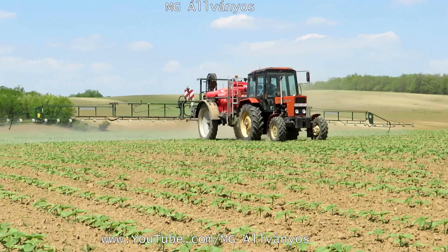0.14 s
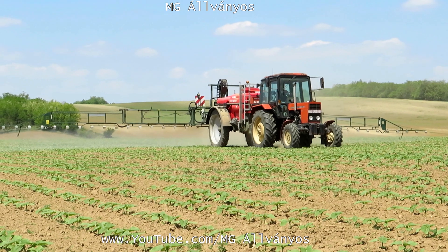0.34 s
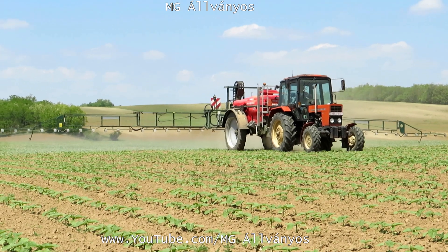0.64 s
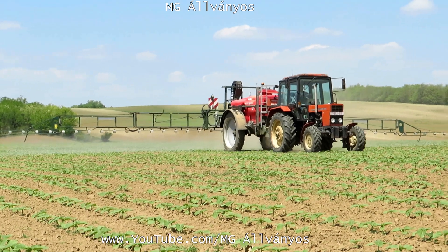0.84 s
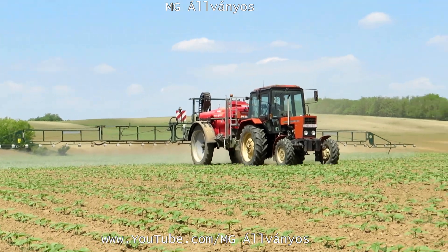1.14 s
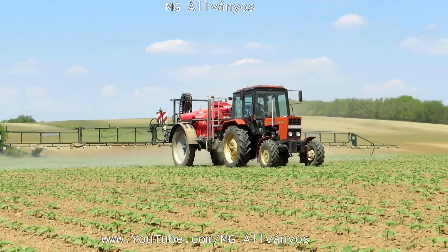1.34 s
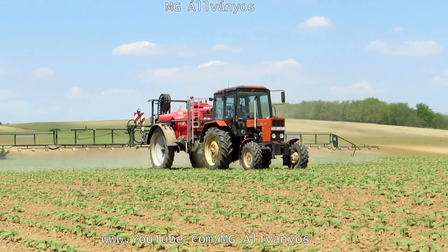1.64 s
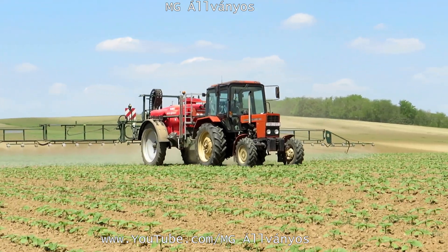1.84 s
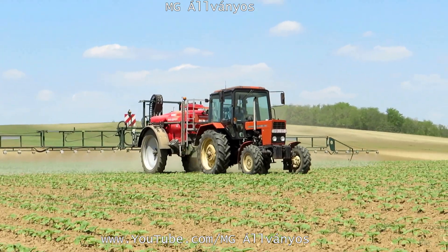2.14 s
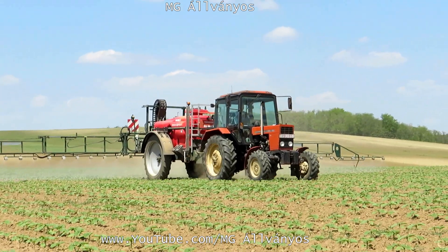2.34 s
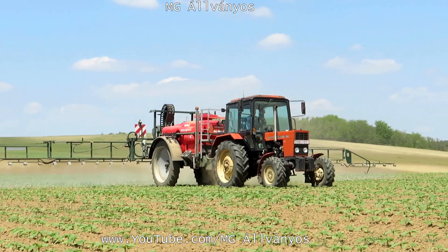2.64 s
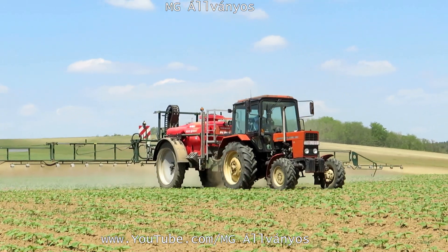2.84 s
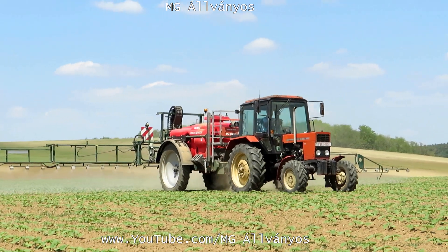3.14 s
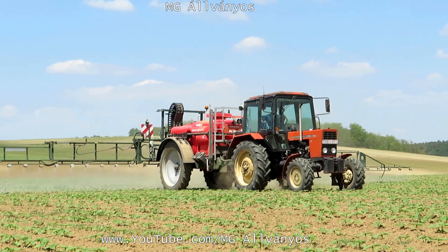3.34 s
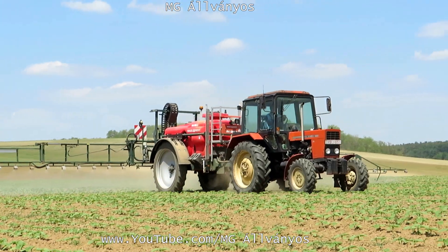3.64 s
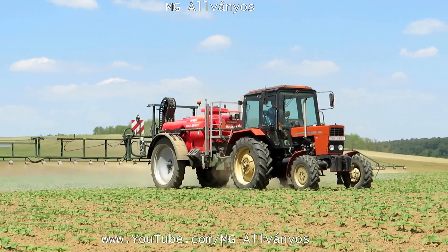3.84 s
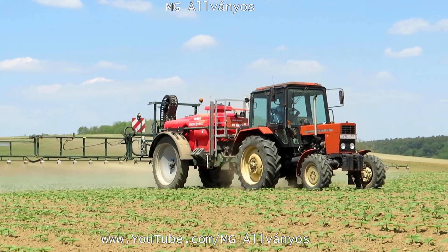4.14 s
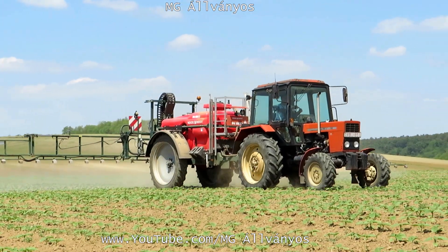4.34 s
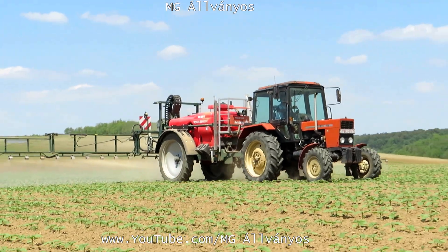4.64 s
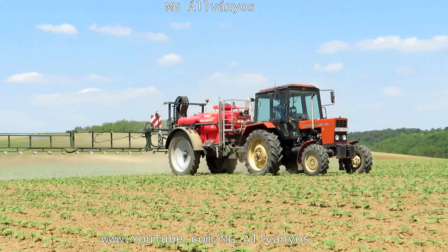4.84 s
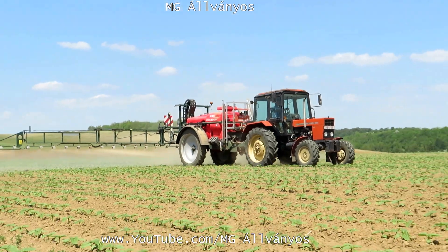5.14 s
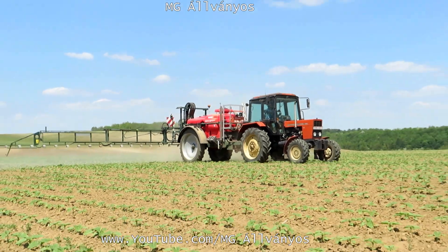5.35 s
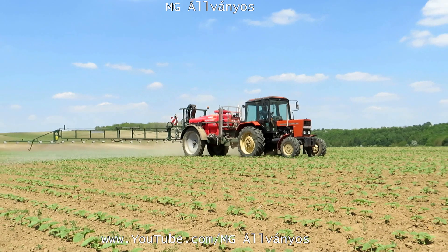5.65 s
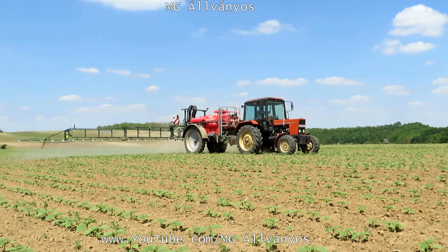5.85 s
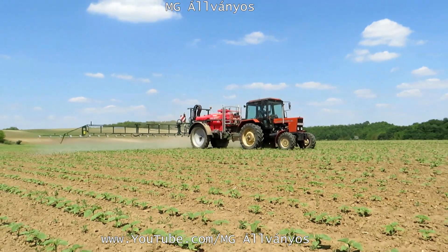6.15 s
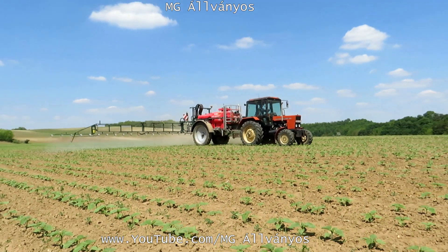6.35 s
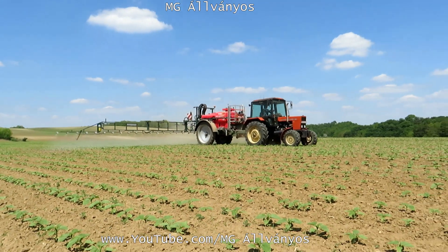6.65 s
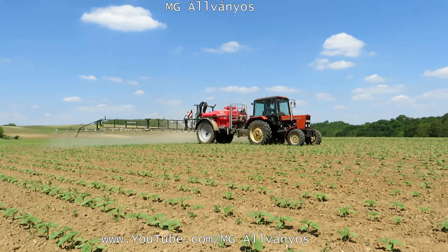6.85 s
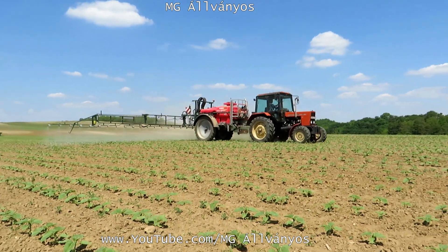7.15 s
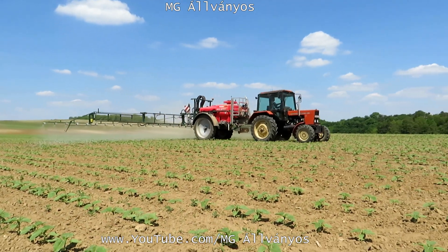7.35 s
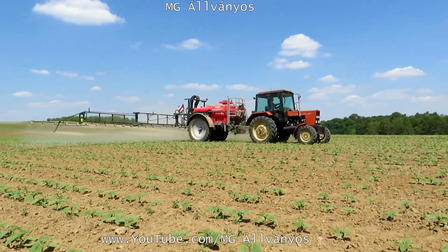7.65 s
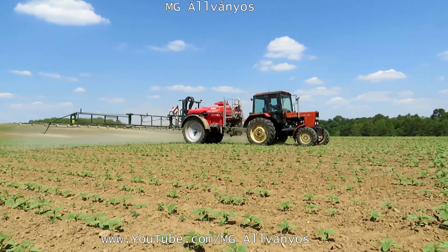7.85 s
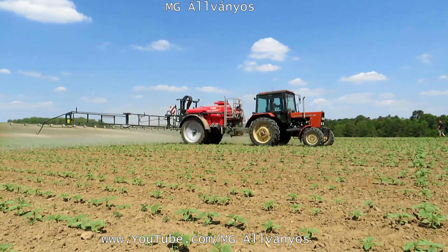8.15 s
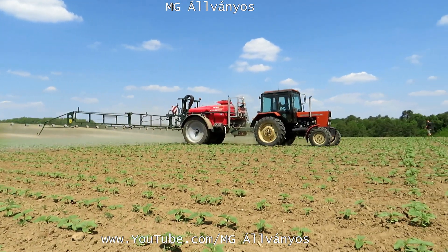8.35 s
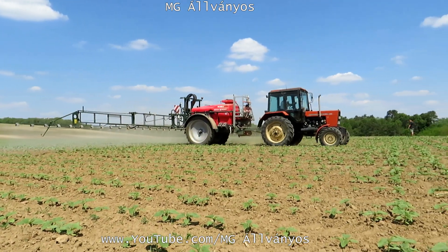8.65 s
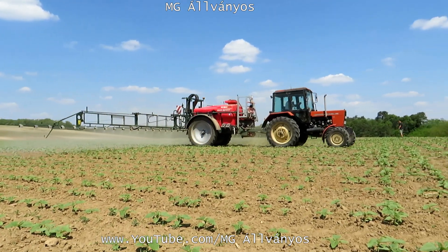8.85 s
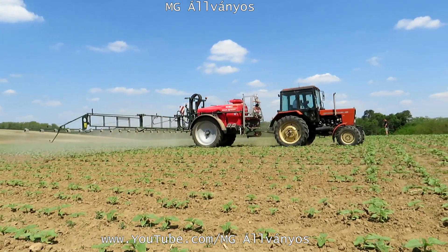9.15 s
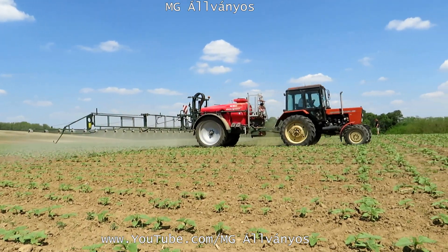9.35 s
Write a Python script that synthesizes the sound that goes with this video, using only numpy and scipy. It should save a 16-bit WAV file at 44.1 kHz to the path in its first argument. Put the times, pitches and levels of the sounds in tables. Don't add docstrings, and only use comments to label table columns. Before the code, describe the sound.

After a thump of wind and a brief gap, a four-cylinder diesel tractor chugs steadily across an open field, knocking and clattering, then eases its throttle.

```python
import sys
import numpy as np
from scipy import signal
from scipy.fft import rfft, irfft, next_fast_len
from scipy.io import wavfile
from scipy.ndimage import uniform_filter1d

SR = 44100
rng = np.random.default_rng(int(sys.argv[2]) if len(sys.argv) > 2 else 0)


def to_wav(s):
    ch = np.atleast_2d(s).T
    pcm = np.round(np.clip(ch, -1, 1) * 32767)
    wavfile.write(sys.argv[1], SR, pcm.astype(np.int16))


def ratio_of_db(decibels):
    return 10 ** (np.asarray(decibels, float) / 20)


N = 419391
TIME = np.arange(N) / SR
COARSE = np.arange(0, N + 64, 64) / SR

# time_s, share (0-1)
EASED = [
    (0, 0),
    (8.4, 0),
    (8.5, 1),
    (9.6, 1),
]
# time_s, level_db, treble_change_in_air_db, first_dark_band (octaves over 1
# kHz), band_depth (0-1)
PATH = [(.2, -10.5, -13.5, 2.5, 0), (.55, -10.5, -3, 2.7, 0), (.94, -9, 1, 1.9, 0), (1.15, -4.5, 0, 3.4, 0),
        (1.55, -2.5, 2, 8.4, 0), (2.05, 0.5, 1, 2.9, 0.5), (2.4, 1, -1.5, 2.86, 0.3),
        (2.9, -1, -1, 2.4, 1.1), (3.6, 0.5, 2, 2.3, 0.87), (4.15, -0.5, 0.5, 2.09, 1.1),
        (4.6, -0.5, -1.5, 1.77, 1), (5.05, 1.5, -0.5, 1.62, 0.86), (5.9, 1.5, -0.5, 1.55, 0.47),
        (6.25, 1.5, 1.5, 1.35, 0.4), (6.7, -0.5, -0.5, 0.94, 0.1), (7.3, 1, -2.5, 1.6, 0.14),
        (8.2, -1.5, -0.5, 1.97, 0.2), (9.5, 0, 1.5, 1.68, 0.3)]
# pitch_hz, level_db
TREBLE = [(3600, 7.5), (4600, 9.5), (6000, 3.5), (8000, -11), (10000, -58.5), (12000, -39), (15000, -55),
          (17000, -91)]
# start_s, jump (full scale 1), treble_change_db
JUMPS = [(.0002, 0.41, 0.1), (2.1606, .14, -6), (2.178, 0.22, -1.5), (3.1283, 0.048, -7.5),
         (4.096, -0.34, 2), (6.997, -0.25, -1), (8.9314, 0.52, -5.5)]


def evened(x):
    return x / np.sqrt(np.mean(x ** 2) + 1e-20)


def curve(rows, column=1, t=TIME):
    return np.interp(t, [row[0] for row in rows], [row[column] for row in rows])


def bump(t, middle_s, half_s):
    return np.exp(-((t - middle_s) / half_s) ** 2)


def filtered(x, response):
    size = next_fast_len(N + 8192)
    return irfft(rfft(x, size) * response(np.fft.rfftfreq(size, 1 / SR)), size)[..., :N]


def coloured(x, points):
    point_hz, point_db = np.transpose(points)
    return filtered(x, lambda hz: ratio_of_db(np.interp(np.log(hz + 1), np.log(point_hz + 1), point_db)))


def wind():
    # time_s, level_db
    strength = [(0, -19.5), (.015, -4.5), (.03, -17.5), (.06, -12), (.098, -12.5), (.112, -31),
                (.16, -38.5), (9.6, -45)]
    # middle_s, level_db, half_length_s
    gusts = [(3.2, -37, 0.063), (4.497, -31.5, 0.2), (4.85, -27.5, 0.11), (5.244, -26, 0.11),
             (5.57, -29, 0.054), (6.05, -31.5, 0.083), (7.205, -35, 1), (8.604, -20.5, .13),
             (8.952, -27.5, 0.21)]
    # pitch_hz, level_db
    colour = [(18, -24), (35, -18), (90, 0), (180, -1), (400, -12.5), (620, -22.5), (1200, -35),
              (4500, -53.5), (12000, -65.5), (16000, -100)]
    # middle_s, size (full scale 1), half_length_s
    buffets = [
        (.0145, 0.85, 0.0022),
        (.0925, 0.48, 0.0041),
    ]
    lumps = ratio_of_db(2.5 * evened(uniform_filter1d(rng.standard_normal(N), 700, mode="wrap")))
    noise = evened(coloured(rng.standard_normal(N) * lumps, colour))
    level = ratio_of_db(curve(strength, t=COARSE)) + sum(ratio_of_db(db) * bump(COARSE, s, half) for s, db, half in gusts)
    pushes = sum(2 * size * (TIME - s) / half * bump(TIME, s, half) for s, size, half in buffets)
    return pushes + np.interp(TIME, COARSE, level) * noise


def cycles(t=COARSE):
    # time_s, gain_cycles
    lead = [(0.2, .05), (.62, .067), (.9, .107), (2.0, .103), (2.3, .137), (3.0, .099), (3.9, .089),
            (4.8, .063), (5.5, .002), (5.9, -.001), (7.0, .005), (7.3, .033), (8.37, .037), (8.5, .097)]
    hunt = 0.01 * np.cos(2 * np.pi * 2.37 * (t - 0.096)) * (1 - curve(EASED, t=t))
    slowing_s = np.maximum(t - 8.52, 0)
    lost = 1.0 * slowing_s + 1.0 * slowing_s ** 2 / 2
    return 15.37 * t + curve(lead, t=t) + hunt - lost


def beats(place, spread_db):
    click_s = np.interp(np.arange(200) - 2 + place, cycles(), COARSE)
    at = np.ceil(SR * click_s).astype(int)
    inside = (at > 0) & (at < N)
    clicks = np.zeros(N)
    clicks[at[inside]] = ratio_of_db(spread_db * rng.standard_normal(200))[inside]
    return clicks


def bursts(clicks, rise_s, decay_s):
    slow, fast = np.exp(-1 / (SR * decay_s)), np.exp(-1 / (SR * rise_s))
    return signal.lfilter([0, 1 - fast], np.convolve([1, -slow], [1, -slow * fast]), clicks)


def mode(hz, centre_hz, width_hz):
    return 1 / (1 - (hz / centre_hz) ** 2 + 1j * hz * width_hz / centre_hz ** 2)


def heard(db, air_share, side_db, eased_db, rocking=0.51):
    turn_s = [4.73, 8.16]
    # middle_s, level_db
    lurches = [(1.57, 3.5), (2.0, 2), (2.16, -6), (2.4, 0.5), (2.82, 5), (3.3, -1), (3.6, 0.5), (4.0, 3.5),
               (4.32, 0), (4.52, 6.5), (4.95, 5), (5.33, 3.5), (5.57, 0.5), (5.85, 0.5), (6.27, 2),
               (6.57, 4.5), (6.95, 3.5), (7.4, 1.5), (7.741, 4), (8.06, 5), (8.29, 3.5), (8.6, 3.5),
               (8.78, 2.5), (8.91, 2), (9.38, 5)]
    total = db + curve(PATH, t=COARSE) + air_share * curve(PATH, column=2, t=COARSE)
    total = total + eased_db * np.sqrt(curve(EASED, t=COARSE))
    total = total + side_db * np.interp(COARSE, turn_s, [0, 1])
    total = total + rocking * sum(lurch_db * bump(COARSE, s, 0.096) for s, lurch_db in lurches)
    return np.interp(TIME, COARSE, ratio_of_db(total))


def pipe(lead, cylinder_db, low, high):
    firings = sum(ratio_of_db(db) * beats(lead + k / 4, spread_db=1.0) for k, db in enumerate(cylinder_db))
    return evened(filtered(firings, lambda hz: 1j * hz * mode(hz, *low) * mode(hz, *high) ** 2))


def exhaust():
    # (pitch_hz, width_hz)
    pulling = [-0.011, (0.38, -1.3, -1.2, 1.4), (77, 46.3), (181.7, 128.4)]
    idling = [-0.0095, (0.66, -0.79, -0.6, 0.18), (130.4, 26), (77, 250)]
    # order (waves per engine cycle), level_db
    branches = [(13, -76), (15, -36), (16, -34.5), (17, -42), (19, -33), (23, -47), (36, -48), (37, -50),
                (38, -44), (46, -43), (50, -43)]
    # pitch_hz, level_db
    gas_colour = [(20, -36), (45, -12), (100, -1), (200, -5), (330, -10), (450, -18), (700, -40),
                  (2000, -110)]
    # level_db, air_share, side_on_db, eased_db
    note_level = (-21.5, 0.1, -2.5, 7.5)
    eased, turns = curve(EASED), cycles(TIME)
    note = ratio_of_db(4.5) * (1 - eased) * pipe(*pulling) + ratio_of_db(1.6) * eased * pipe(*idling)
    tones = sum(ratio_of_db(db + 21) * np.cos(2 * np.pi * (k * (turns + 0.01) - 0.08)) for k, db in branches)
    rumble = ratio_of_db(-13 + 4.4 * eased) * evened(coloured(rng.standard_normal(N), gas_colour))
    return heard(*note_level, rocking=0.69) * (note + (1 - 0.6 * eased) * tones + rumble)


def fan():
    # level_db, air_share, side_on_db, eased_db
    fan_level = (-30, -0.1, 8, -2)
    blades = 11.0117 * cycles(TIME)
    hum = np.cos(2 * np.pi * (blades - 0.09)) + ratio_of_db(-22) * np.cos(4 * np.pi * blades)
    return np.sqrt(2) * heard(*fan_level) * hum


def clatter():
    # place_in_cycle (0-1), level_db
    cylinders = [
        (0, -3),
        (0.253, -5.5),
        (0.502, -0.5),
        (0.744, -4),
    ]
    # pitch_hz, level_db
    body_colour = [(150, -11.5), (250, -6.5), (390, -13.5), (580, -8), (1120, -10), (1330, -8.5),
                   (1670, -11), (2060, -15.5), (2400, -11), (3100, -15.5), (3500, -26), (4200, -67),
                   (7000, -120)]
    # pitch_hz, level_db
    panel_colour = [(1500, -88), (2800, -30), (3400, 15.5), (4400, 9), (5200, -37), (8000, -83)]
    # level_db, air_share, side_on_db, eased_db
    body_level = (-31, 0.48, 4.5, -1.5)
    panel_level = (-45, 0.7, -4.5, 0)
    hood_level = (-47, 1, 11, 1.5)
    top_level = (-37, 0.96, -1.1, 0.5)
    firings = sum(ratio_of_db(db) * bursts(beats(at, spread_db=2.0), 0.00058, 0.0068) for at, db in cylinders)
    ticks = (rng.random(N) < 150 / SR) * ratio_of_db(3.0 * np.minimum(rng.exponential(1, N), 3))
    swell = 0.32 + (1 - 0.56 * curve(EASED)) * firings + 0.11 * bursts(ticks, 0.00014, 0.00043)
    noise = rng.standard_normal(N) * swell
    body = ratio_of_db(3.5) * heard(*body_level) * evened(coloured(noise, body_colour))
    panel = ratio_of_db(1.5) * heard(*panel_level) * evened(coloured(noise, panel_colour))
    hood = heard(*hood_level) * evened(filtered(noise, lambda hz: 1j * hz * mode(hz, 955, 130) ** 2))
    top = ratio_of_db(-4.0) * heard(*top_level) * evened(coloured(noise, TREBLE))
    return body + panel + hood + top


def knock():
    # pitch_hz, width_hz, level_db
    block = [(1110, 130, -23), (1600, 660, -10.5), (2190, 230, -3.5), (2847, 160, -1.5), (3530, 160, -10),
             (4150, 170, -17)]
    # time_s, level_db
    hard = [(1.587, 3.5), (1.653, 3), (2.042, 3.5), (2.561, 4.5), (2.627, 5), (2.692, 3), (2.757, 3.5),
            (3.148, 4), (3.215, 2.5), (3.409, 4), (3.604, 2), (3.8, 2.5), (3.93, 4.5), (4.127, 3),
            (4.973, 2.5), (5.432, -3.5), (5.627, 3), (6.54, 3.5), (6.605, 1), (6.67, 3)]
    # level_db, air_share, side_on_db, eased_db
    thud_level = (-21, 0.3, -4, -18)
    rattle_level = (-17, 1.1, -8, -30)
    fizz_level = (-29, 2, 1, -27)
    place = 0.493
    t = TIME[:600]
    thump = np.sin(2 * np.pi * 610 * t) * (t / 0.0013) ** 2 * np.exp(-t / 0.00095)
    thud = signal.oaconvolve(beats(0.462, spread_db=0.3), thump)[:N]
    harder_db = sum(db * (abs(COARSE - s) < 0.02) for s, db in hard)
    blow = beats(place, spread_db=1.5) * ratio_of_db(np.interp(TIME, COARSE, harder_db))
    shake = bursts(blow, 0.00047, 0.0034) + 0.088 * bursts(blow, 0.0011, 0.026)
    rattle = 0
    for centre_hz, width_hz, db in block:
        varying = bursts(beats(place - 0.02, spread_db=1.7), 0.0002, 0.066)
        drive = rng.standard_normal(N) * shake * varying
        ring = filtered(drive, lambda hz: 1j * hz * mode(hz, centre_hz, width_hz) * mode(hz, 3530, 5400) ** 2)
        rattle = rattle + ratio_of_db(db) * evened(ring)
    fizz = coloured(rng.standard_normal(N) * shake, TREBLE)
    low = ratio_of_db(-13.5) * heard(*thud_level) * evened(thud)
    sharp = ratio_of_db(-12.0) * heard(*rattle_level) * evened(rattle)
    return low + ground(sharp + ratio_of_db(-9.0) * heard(*fizz_level) * evened(fizz))


def sizzle():
    # pitch_hz, level_db
    sizzle_colour = [(5000, 8.5), (7500, 13), (10000, 6), (12500, -4.5), (14500, -17), (16000, -43)]
    # level_db, air_share, side_on_db, eased_db
    sizzle_level = (-65, 1.9, 7.5, -1.5)
    strong = bursts(beats(0.495, spread_db=2.5), 0.0008, 0.006)
    weak = bursts(beats(0.02, spread_db=2.5), 0.0008, 0.006)
    flow = 0.21 + (1 - 0.97 * curve(EASED)) * (strong + 0.4 * weak)
    return ratio_of_db(10.5) * heard(*sizzle_level) * evened(coloured(rng.standard_normal(N) * flow, sizzle_colour))


def ground(x):
    # time_s, delay_ms, strength (0-1)
    soil = [(0, 1.306, 0.5), (3, 1.352, 0.44), (7.2, 1.34, 0.42), (8.3, 1.184, 0.43), (9.6, 1.15, 0.24)]
    turned = filtered(x, lambda hz: np.exp(2j) + 0 * hz)
    share = curve(soil, column=2)
    late = np.interp(TIME - curve(soil) / 1000, TIME, turned)
    return (x + share * late) / np.sqrt(1 + share ** 2)


def shadowed(x):
    # octaves_over_first, level_db
    bands = [
        (0.01, -9.5),
        (.72, -0.5),
        (1.2, -2),
    ]
    hz, t, z = signal.stft(x, SR, nperseg=256)
    octave = np.log2(hz[:, None] / 1000 + 1e-3) - curve(PATH, column=3, t=t)
    db = curve(PATH, column=4, t=t) * sum(d * bump(octave, at, 0.34) for at, d in bands)
    return signal.istft(z * ratio_of_db(db), SR, nperseg=256)[1][:N]


def gated(x):
    span_s = (4.77, 7.11)
    edge_hz = 5000
    hz, t, z = signal.stft(x, SR, nperseg=1024)
    db = 10 * np.log10(uniform_filter1d(abs(z.mean(0)) ** 2, size=2, axis=0) + 1e-14)
    mean_db = uniform_filter1d(uniform_filter1d(db, size=30, axis=1), size=25, axis=0)
    limit_db = np.maximum(mean_db + 1.5, -78)
    quiet = np.clip((limit_db - db) / 2, 0, 1)
    on = (t > span_s[0]) * (t < span_s[1]) * np.clip(hz[:, None] / edge_hz * 4 - 3.5, 0, 1)
    octaves_over = np.log2(hz[:, None] / edge_hz + 1e-3).clip(0)
    cut_db = -17 * quiet - 3.5 * octaves_over
    return signal.istft(z * ratio_of_db(cut_db * on), SR, nperseg=1024)[1][:, :N]


def scene():
    # pitch_hz, level_db
    side_colour = [(60, -28), (100, -18.5), (170, -17.5), (290, -6.5), (500, -17), (850, -88),
                   (1440, -16.5), (2440, -20.5), (4140, -12.5)]
    # pitch_hz, level_db
    right_colour = [(60, -.2), (125, -.5), (300, 2.6), (600, .3), (1500, .5), (5000, 1.0), (10000, .6)]
    gusting = wind()
    engine = exhaust() + fan()
    metal = shadowed(ground(clatter() + sizzle()) + knock())
    dips_db = sum(db * (COARSE > s) * np.exp(-abs(COARSE - s) / 0.014) for s, jump, db in JUMPS)
    metal = metal * np.interp(TIME, COARSE, ratio_of_db(dips_db))
    tractor = (engine + metal) * np.interp(TIME, [0.09, 0.11], [0.3, 1])
    scatter = rng.standard_normal(3000) * np.exp(-np.arange(3000) / 500)
    scattered = signal.oaconvolve(tractor, scatter / np.linalg.norm(scatter))[:N]
    side = coloured(scattered, side_colour)
    return np.array([tractor - side, coloured(tractor, right_colour) + side]) + gusting


def band_limit(x):
    return signal.sosfilt(signal.butter(12, 15800, fs=SR, output="sos"), x)


def record(dry):
    gap_s = (.1588, .1925)
    mix = np.tanh(gated(dry)) * ((TIME < gap_s[0]) | (TIME > gap_s[1]))
    fade = np.exp(-TIME[:600] / 0.0009)
    for s, jump, dip_db in JUMPS:
        start = int(s * SR) + 1
        mix[:, start:start + 600] += jump * ratio_of_db([[1.8], [-1.8]]) * fade
    return band_limit(mix)


dry = scene()
out = record(dry)
to_wav(out)
```